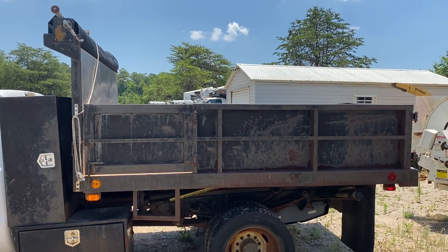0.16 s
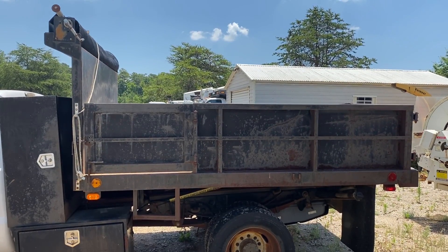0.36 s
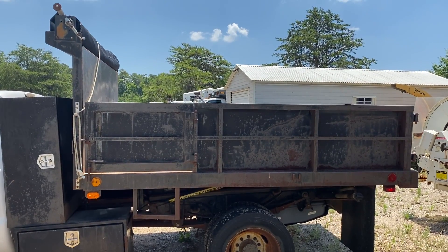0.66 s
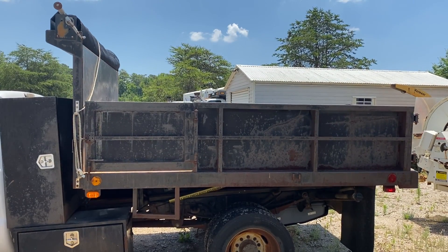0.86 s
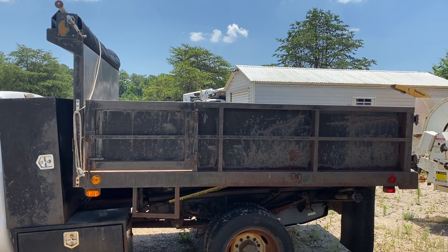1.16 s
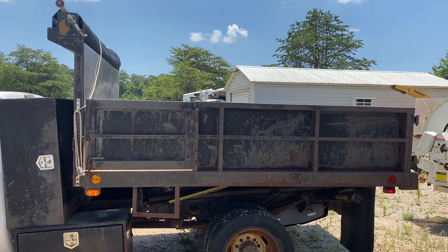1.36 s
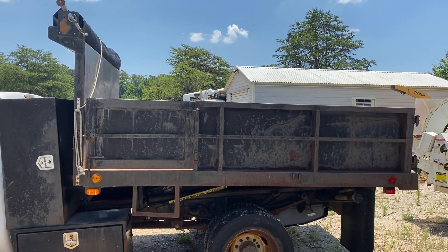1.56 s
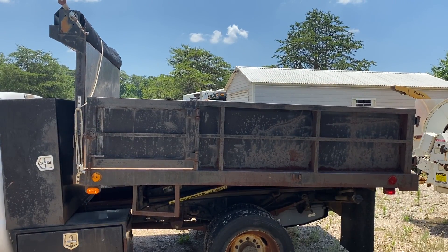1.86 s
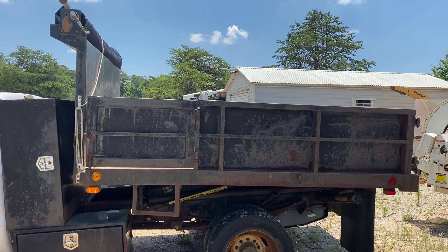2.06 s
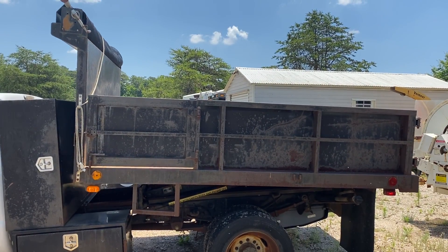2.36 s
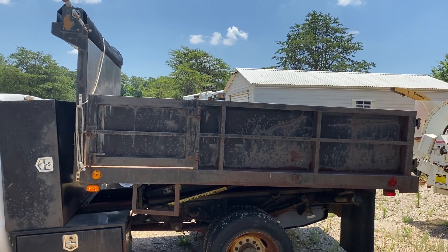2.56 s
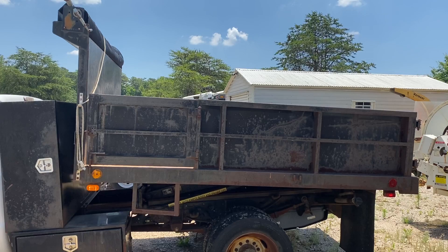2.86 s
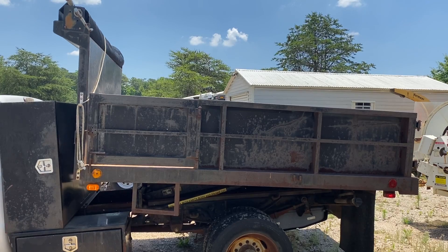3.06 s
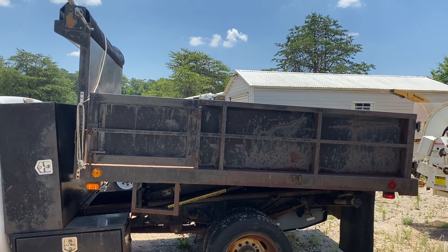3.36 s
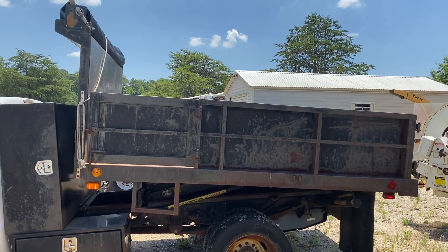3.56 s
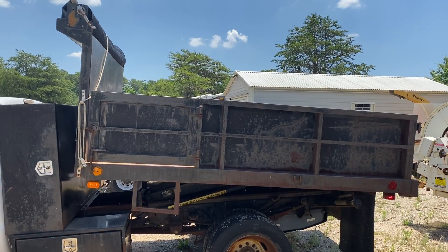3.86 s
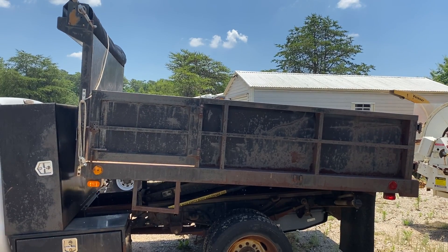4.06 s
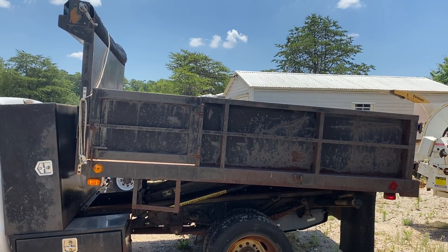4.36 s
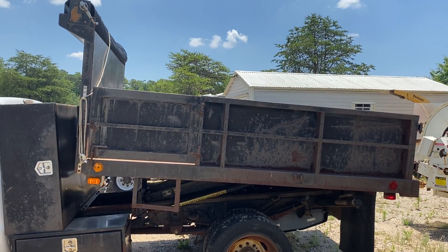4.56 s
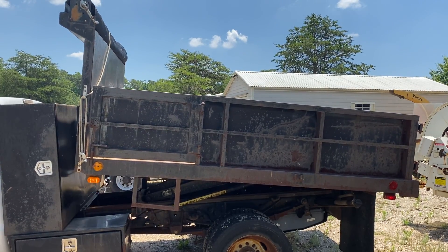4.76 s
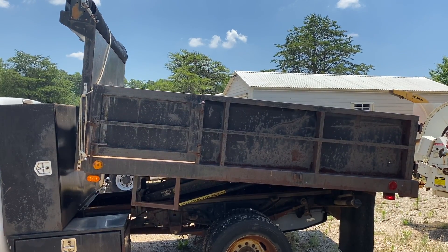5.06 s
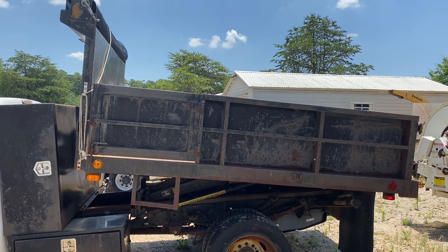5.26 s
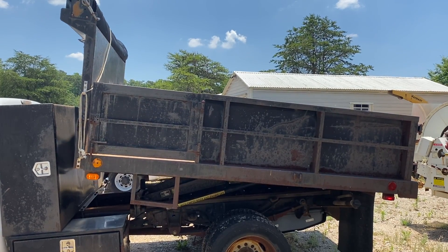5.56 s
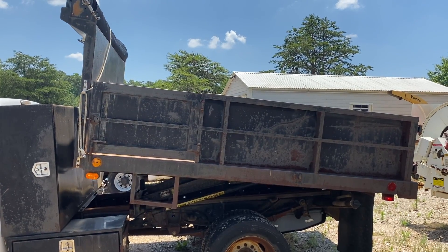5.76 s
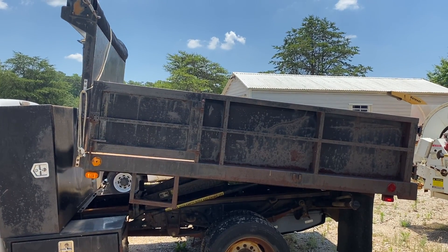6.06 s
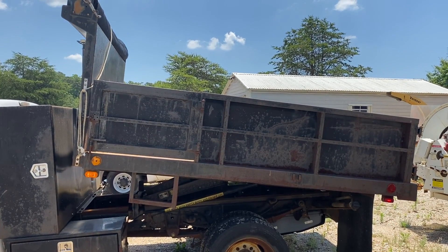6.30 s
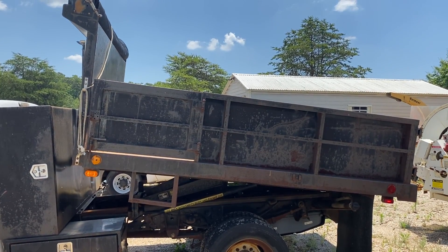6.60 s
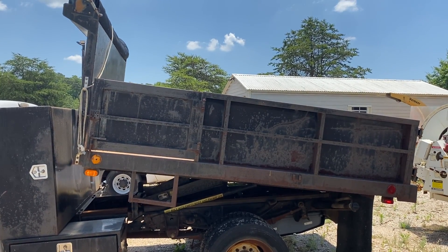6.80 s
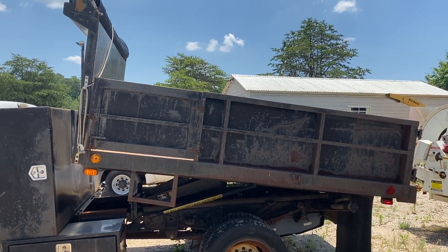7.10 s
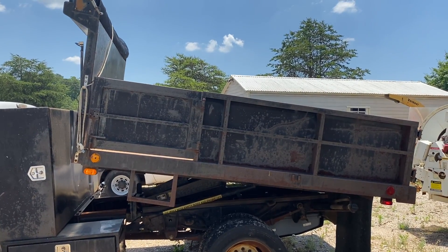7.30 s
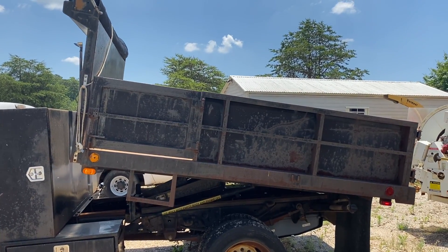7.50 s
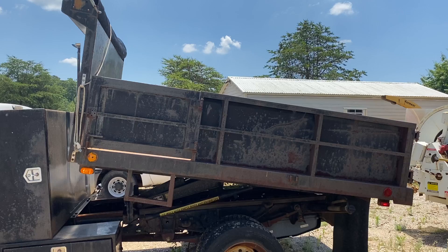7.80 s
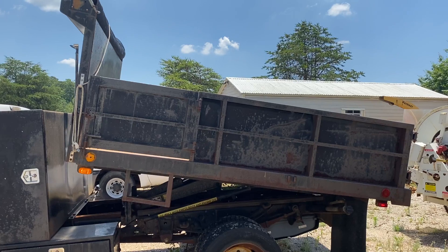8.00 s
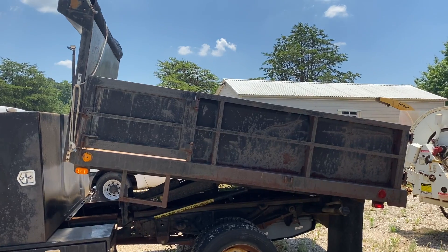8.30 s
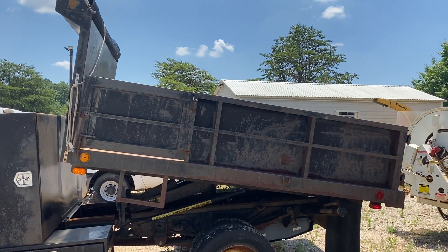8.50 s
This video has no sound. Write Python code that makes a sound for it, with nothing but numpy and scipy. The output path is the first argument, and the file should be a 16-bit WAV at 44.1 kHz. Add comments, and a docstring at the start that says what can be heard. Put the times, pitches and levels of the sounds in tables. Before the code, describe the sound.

Outdoors a few steps from a dump truck, an electric hydraulic pump is already whining as the bed rises. The thin, metallic whine climbs very slightly, swelling and fading, strongest early and mainly on the left. Beneath it an engine idles with low hums and broad rumble, and oil and motor air hiss. A few small taps land at the right; later a panel rings in quick throbs.

```python
"""Beside a dump truck, a few steps off: an electric motor drives the hoist's gear pump and slowly gains speed.
The 13 teeth whine in a stack of sines that swell and fade as the bed rises; a drifting pattern repeated at every
turn of the shaft adds faint lines between them. An engine idles as a firing tone and low hums, behind shaped noise:
a broad rumble, mostly on the left, and a rush of oil and motor air. Later a panel rings in throbbing bouts.
A few small taps, decaying sines, reach almost only the right microphone."""
import sys
import numpy as np
from scipy import signal
from scipy.fft import rfft, irfft, next_fast_len
from scipy.io import wavfile
from scipy.ndimage import uniform_filter1d, map_coordinates

SR = 44100
rng = np.random.default_rng(int(sys.argv[2]) if len(sys.argv) > 2 else 0)


def dump(signal):
    """Clip the signal to [-1, 1] and save it as 16-bit WAV at the path in sys.argv[1]."""
    limited = np.clip(np.atleast_2d(signal).T, -1, 1)
    pcm = np.round(limited * 32767).astype(np.int16)
    wavfile.write(sys.argv[1], SR, pcm)


N = 381024
TIME = np.arange(N) / SR
TEETH, SLOTS = 13, 29  # pump teeth and motor slots, passing once each per shaft turn
CYLINDERS = 8
BOUT_THROB_HZ = 7.5

# The pump gaining speed. Each row: time in seconds, tooth contacts in Hz.
PUMP_SPEED = [(0.0, 1099.0), (0.56, 1106.6), (1.04, 1115.5), (1.68, 1122.6), (2.0, 1127.5), (3.12, 1138.7),
              (3.36, 1141.7), (4.16, 1147.1), (4.56, 1151.6), (5.68, 1160.6), (7.92, 1173.8),
              (8.62, 1179.9)]
# The idling engine. Each row: time in seconds, firings in Hz.
ENGINE_FIRING = [(0, 41.97), (1.2, 42.03), (2.5, 41.98), (4.1, 42.09), (5.1, 42.02), (6.0, 41.91),
                 (6.8, 41.95), (8.64, 41.92)]
# Phase between the microphone ports. Each row: frequency in Hz, lead of the right port in rad.
PORT_LEAD = [(25, -0.45), (110, -0.83), (215, -1.65), (330, 0.49), (1200, 0.5), (2000, -2), (3000, 0.029),
             (6500, -1.67)]


def amp(db):
    """Gain of a level in dB."""
    return 10 ** (np.asarray(db) / 20)


def along(points, hz):
    """Columns of (Hz, value, ..) points read on a log axis."""
    f, *cols = np.transpose(points)
    return np.squeeze([np.interp(np.log(hz + 1), np.log(f + 1), c) for c in cols])


def curves(rows):
    """One value per sample for each column after the time."""
    s, *cols = np.transpose(rows)
    return np.array([np.interp(TIME, s, c) for c in cols])


def swells(rows):
    """Gain of (s, dB, ..) rows, joined in amplitude: round tops and sharp dropouts."""
    s, *cols = np.transpose(rows)
    return np.squeeze([np.interp(TIME, s, amp(c)) for c in cols])


def wobble(rate, times=TIME):
    """A smooth random curve, rate knots a second."""
    coarse = TIME[::64]
    knots = rng.standard_normal(int(N * rate / SR) + 4)
    return np.interp(times, coarse, map_coordinates(knots, [coarse * rate]))


def lift_db(modes, hz):
    """Narrow resonant lifts at (Hz, width Hz, dB) modes."""
    return sum(db / (1 + (2 * (hz - c) / w) ** 2) for c, w, db in modes)


def filtered(x, response):
    """x times a complex response of frequency."""
    m = next_fast_len(N + SR // 2)
    return irfft(rfft(x, m) * response(np.fft.rfftfreq(m, 1 / SR)), m)[..., :N]


def ports(pair, level_db):
    """Two unrelated signals mixed to the likeness, phase and level of the left and right channels."""
    # How alike the two microphone ports are below the treble. Each row: frequency in Hz, likeness from 0 to 1.
    alike = [(25, .5), (60, 0.82), (200, 0.91), (260, 0.4), (380, 0.98), (600, 0.76), (1400, 0.34),
             (3000, 0.47), (5500, 0.41), (7000, 0.6)]
    # Likeness of the left and right channels in the treble. Each row: frequency in Hz, likeness from 0 to 1.
    treble_alike = [(8500, .99), (9900, .8), (10900, .99), (12000, .75), (13000, .99), (14300, .8),
                    (15200, .99)]
    # Phase between the channels in the treble, in steps of half a turn.
    # Each row: frequency in Hz, phase of right against left in rad.
    treble_phase = [(8550, 3.14), (9500, 3.14), (10700, 6.28), (11650, 6.28), (12600, 9.42), (13500, 9.42),
                    (14900, 12.57)]

    def response(hz):
        likeness = np.clip(along(alike + treble_alike, hz), 0, 1)
        turn = np.arccos(likeness) / 2
        mix = np.array([[np.cos(turn), np.sin(turn)], [np.cos(turn), -np.sin(turn)]])
        shift = np.exp(.5j * np.outer([-1, 1], along(PORT_LEAD + treble_phase, hz)))
        return mix * (shift * amp(level_db(hz)))[:, None]
    return filtered(pair[None], response).sum(axis=1)


def noise(spectrum, patchy_db, modes=()):
    """Noise of a given density in both channels, with patches of random gain and narrow lifts."""
    z = signal.stft(rng.standard_normal((2, N)), nperseg=512)[2]
    field = rng.standard_normal(z.shape[1:])
    field = uniform_filter1d(field, size=6, axis=0)  # smooth over frequency
    field = uniform_filter1d(field, size=14, axis=1)  # smooth over time
    patches = amp(patchy_db * field / field.std())
    pair = signal.istft(z * patches, nperseg=512)[1][:, :N]
    return ports(pair * np.sqrt(SR / 2), lambda hz: along(spectrum, hz) + lift_db(modes, hz))


def teeth(turns, firing):
    """Strong tooth and slot tones; the moving bed shifts their reflections, so each fades in its own time."""
    # The main whine. Each row: time in seconds, left and right RMS level in dB, left lead in rad.
    whine = [(0.0, -31.5, -45, -2), (0.48, -27, -36, 0.5), (0.8, -31.5, -48, 3), (1.04, -29.5, -45, 4.5),
             (1.36, -30.5, -57.0, 8.5), (1.6, -45, -40.5, 8), (1.68, -58, -42.5, 8), (1.84, -41, -36, 6),
             (2.16, -31, -34.5, 6.5), (2.8, -38.5, -64, 5.5), (2.9, -42, -56, 4.5), (2.97, -54, -47.5, 4),
             (3.08, -52, -46, 5), (3.23, -40.5, -40, 6.5), (3.52, -36, -40.5, 6.5), (4.16, -35.5, -47.5, 6),
             (4.32, -38, -54, 4.3), (4.46, -38.5, -53, 4), (4.62, -52, -47, 3.5), (4.73, -45.5, -48, 1.5),
             (5.12, -37.5, -46.5, 1.0), (6.16, -39.5, -50, -0.5), (6.4, -45, -49.5, -1.5),
             (6.72, -47, -47.0, -1.1), (6.96, -42.5, -50, -2), (7.6, -46, -49, -1.3), (8.08, -38, -47, 0.5),
             (8.62, -35, -40.5, 1.1)]
    # Tooth tones 2 to 5 and the motor's slot tone (29), keyed by order of the shaft.
    # Each row: time in seconds, left and right RMS level in dB, left lead in rad.
    overtones = { 26: [(0.0, -63, -66.0, 2.8), (0.54, -49, -55, 0), (0.75, -57, -61.5, 1),
                 (1.14, -54, -56, 2.2), (1.62, -48, -54, 0.7), (2.01, -53.5, -53, 0.3),
                 (2.88, -52.5, -51.5, 0.2), (3.15, -63.5, -67, -2), (3.45, -52.0, -51, -1),
                 (3.66, -46.5, -51.0, 0.3), (4.08, -48.5, -59, -0.3), (4.41, -62.0, -61.0, -0.9),
                 (4.56, -58.0, -68.0, -4), (4.86, -53, -57.5, -5), (5.13, -58.5, -59, -5.5),
                 (6.21, -50.5, -60, -8.5), (6.69, -57.5, -63, -7.0), (7.17, -52, -49.0, -5.6),
                 (7.74, -46.5, -46.5, -5), (8.04, -64.0, -58.0, -5.9), (8.11, -72, -68, -5.5),
                 (8.19, -56, -63.5, -5), (8.61, -51.0, -50.5, -5.1)], 39: [(0.0, -60, -59.5, 3.5),
                 (0.15, -53, -54.0, 0), (0.42, -54, -64.5, 0), (0.66, -57, -61, 3.2),
                 (1.02, -49.5, -53.5, 1.3), (1.68, -57.5, -58, 0.3), (2.34, -45.5, -49.0, 0.7),
                 (2.82, -56, -55, 0.9), (3.21, -47.0, -56.5, 1.3), (3.63, -46.5, -52.0, 0.9),
                 (4.32, -49.5, -57.0, 1.5), (4.92, -51.5, -58, 1), (5.07, -67.0, -66, 1),
                 (5.31, -47.5, -57, 1.7), (6.18, -53.5, -54.5, 1.2), (6.57, -54, -61.0, 1.5),
                 (7.2, -66, -64, -1.5), (7.44, -48, -61.5, 0.6), (7.74, -49, -56.5, 0.8),
                 (8.07, -66.0, -67.5, 1), (8.37, -49.0, -60.0, 7.5), (8.61, -68.0, -69.0, 4)],
                 52: [(0.0, -53.5, -56, -0.5), (0.24, -54.5, -60.0, -0.5), (0.51, -59.5, -64.0, -4.1),
                 (0.78, -50.5, -60.5, -6), (0.96, -57, -58.5, -7), (1.53, -50.5, -54.0, -5.5),
                 (1.65, -57, -64, -6), (2.46, -45.5, -49.5, -5.5), (2.79, -63.5, -65.5, -5),
                 (3.09, -45.5, -51.5, -5.5), (3.45, -46, -50.0, -5.8), (3.78, -54, -62, -6.7),
                 (4.05, -47.5, -58.0, -4.9), (4.56, -59, -55, -7.5), (4.95, -53.5, -67, -7.5),
                 (5.49, -55, -65, -8), (5.76, -49.0, -63.5, -5.4), (6.0, -62, -66.5, -6),
                 (6.36, -52, -53, -7), (6.54, -69.0, -75.0, -6), (7.26, -42.0, -54, -5.5),
                 (8.1, -43.0, -47.5, -5.5), (8.43, -66, -71.0, -4.5), (8.61, -48.5, -72.5, -1)],
                 65: [(0.0, -58, -60.0, 2), (0.18, -49, -49.5, -1), (0.27, -58, -52.5, 0),
                 (0.48, -50, -47, -4.4), (0.63, -44, -57.5, -2), (0.72, -46, -50.0, 1),
                 (0.93, -55.5, -50.0, -0.5), (1.05, -61, -64, 0.5), (1.29, -53.0, -48.0, -1),
                 (1.44, -60.5, -49, 1), (1.68, -53, -52, 0.6), (2.04, -52, -70.5, -1.5),
                 (2.25, -62.0, -63.0, -1.8), (2.43, -60, -61.5, 2.1), (2.73, -54, -63.5, 4.5),
                 (2.88, -57, -76.5, 1), (3.18, -64.0, -55, 2.5), (4.11, -52.5, -67.5, 11.5),
                 (4.44, -83.0, -66, 15), (4.77, -59.0, -63, 13.5), (5.49, -70, -70, 5), (5.76, -59, -57, 6),
                 (6.21, -63, -65, 6.5), (6.93, -58, -55, 5), (7.29, -58.0, -60.0, 6),
                 (7.5, -66.0, -66.0, 0.3), (7.77, -62.5, -57, -1.3), (8.61, -61.0, -65.5, 6)],
                 29: [(0.0, -61, -62.5, 1.6), (0.45, -58, -70.5, 7.5), (1.65, -50.5, -55.5, 6.9),
                 (2.13, -58, -63, 6.9), (2.55, -51.5, -52.0, 6.9), (3.0, -61.0, -61, 6.7),
                 (4.2, -63, -66.5, 6.1), (4.62, -57, -56.5, 7.3), (5.25, -61.0, -68.0, 7.6),
                 (5.67, -53, -66.0, 6.6), (6.36, -61, -61.0, 7.1), (6.45, -76.0, -66.0, 5.8),
                 (7.05, -54, -63, 6.6), (8.61, -55, -56, 7.0)], }
    # The main whine drops out for a moment: centre in seconds, Gaussian width in seconds.
    dropout = (3.244, .009)
    out = np.zeros((2, N))
    for order, rows in {TEETH: whine, **overtones}.items():
        left, right, _ = swells(rows)
        lead = curves(rows)[2]
        # the idling engine shakes the pump, which bends high tones most
        shake = 0.0032 * order * wobble(2.37) * np.sin(firing)
        phase = 2 * np.pi * order * turns + shake
        flutter_db, rate = 0.9, 11
        if order == TEETH:
            flutter_db = 0.4
        elif order == SLOTS:
            flutter_db, rate = 1.6, 28
        gain = amp(flutter_db * np.array([wobble(rate), wobble(rate)]))
        if order == TEETH:
            centre_s, width_s = dropout
            gain = gain * (1 - np.exp(-((TIME - centre_s) / width_s) ** 2))
        out += gain * [left * np.sin(phase + lead / 2), right * np.sin(phase - lead / 2)]
    return np.sqrt(2) * out


def seventh_tone(turns):
    """The 7th tooth tone, faint except while it glides through narrow resonances."""
    # The resonances. Each row: frequency in Hz, width in Hz, lift in dB.
    lifts = [(7675, 40, 11), (7700, 120, 9.2), (7780, 30, 4), (8060, 13, 3.8)]
    # The stereo balance: right level over the left in dB, left lead in rad.
    side = (1.8, -0.5)
    over_db, lead_rad = side
    base_db, waver_db = -68, 2.5
    level_db = base_db + lift_db(lifts, 7 * curves(PUMP_SPEED)[0])
    phase = 2 * np.pi * 7 * TEETH * turns
    runout = 1 + 0.49 * np.sin(2 * np.pi * turns + wobble(3))  # lines one turn to each side
    level = runout * amp(level_db + waver_db * wobble(5))
    return np.sqrt(2) * level * [np.sin(phase + lead_rad), amp(over_db) * np.sin(phase)]


def shaft(turns):
    """No two teeth are alike: a pattern that repeats every turn and slowly drifts."""
    # Lines at each shaft turn, ahead of side and housing gains. Each row: frequency in Hz, level in dB.
    turn_lines = [(300, -62), (1200, -69), (2000, -80), (2700, -75), (4500, -73), (5200, -79), (5800, -71),
                  (7400, -73), (8600, -84), (12000, -85), (15000, -83)]
    # Weaker high tooth tones, ahead of the same gains. Each row: multiple of the tooth rate, level in dB.
    high_tones = [(6, -66), (8, -74), (9, -77), (10, -74), (11, -72), (12, -76), (13, -73), (14, -70)]
    # Side gains of the shaft lines. Each row: frequency in Hz, left and right gain in dB.
    side = [(1000, 0, -5), (4500, 0, -4), (6500, 0, 0)]
    # The pump housing lifts a tone gliding through. Each row: frequency in Hz, width in Hz, lift in dB.
    housing = [(348, 10, 17), (2845, 30, 9), (7700, 400, 4), (10090, 100, 10), (10360, 50, 11),
               (11140, 250, 8), (12775, 90, 11), (13330, 220, 9), (13770, 120, 9), (14560, 120, 11),
               (14920, 160, 6), (15270, 90, 10)]
    drift_s, steps, orders = .25, 4096, np.arange(1, 190)
    line_db = along(turn_lines, orders * turns[-1] * SR / N)
    level = amp(line_db + rng.normal(0, 0.56, len(orders)))
    level[TEETH - 1::TEETH] = 0
    for multiple, db in high_tones:
        # run-out of the shaft puts lines beside each tooth tone
        level[multiple * TEETH - 2:][:4] += amp(db - np.array([14, 0, 12, 18]))
    level[2 * SLOTS - 1::SLOTS] *= amp(6)  # slot overtones stand out
    knots = int(N / SR / drift_s) + 2
    drawn = rng.standard_normal((2, knots, len(orders), 2)) @ [1, 1j]
    tooth = orders % TEETH == 0
    steady = np.array([1.3, 0])[:, None, None]
    drawn[..., tooth] = 0.17 * drawn[..., tooth] + steady  # the tooth tones hold steady
    lines = np.zeros((2, knots, steps // 2 + 1), complex)
    lines[..., orders] = drawn * level * steps / 2
    where = [TIME / drift_s, turns % 1 * steps]
    patterns = irfft(lines, steps)
    pair = np.array([map_coordinates(p, where, order=1, mode="grid-wrap") for p in patterns])
    blend = where[0] % 1
    pair = pair / np.hypot(blend, 1 - blend)  # even power while one pattern gives way to the next
    return ports(pair, lambda hz: along(side, hz) + lift_db(housing, hz))


def hums(firing):
    """Firing tone and hums, steady or smeared; engine lines start in step and make a lump each cycle."""
    # The firing tone wavers, sinks, then returns. Each row: time in seconds, RMS level in dB, waver in dB.
    idle = [(0, -43, 9), (1.15, -43, 1), (1.3, -49.5, 5), (4.55, -53, 4), (4.7, -45.5, 2), (6.8, -43, 2),
            (8.64, -39, 1.6)]
    # One row for each hum, cycle orders then the fixed-frequency hums: left and right RMS level in dB at mid-
    # scene, unsteadiness from 0 to 1, growth in dB per second.
    hum_levels = [(-55, -56, .2, 0), (-49.5, -48.5, 0.07, -0.5), (-48.5, -48, 0.23, 0),
                  (-41.5, -43.5, 0.07, -.66), (-50.5, -53.5, 0.05, 0), (-44.5, -53.5, 0.1, 0.8),
                  (-51, -57, .15, 0), (-51.5, -63, 0.16, 0), (-39.5, -53, 0.08, 0), (-53.5, -62, 0.3, 0.5),
                  (-60.5, -72, 0.1, 1.5), (-56.5, -68, 0.2, 0), (-55, -65, 0.25, 1), (-59, -69, .2, 1.5),
                  (-63, -72, 0.14, 0), (-56.5, -63.5, 0.1, 1.2), (-55, -54, 0.25, -0.5),
                  (-43.5, -48.5, 0.38, -.5), (-43, -51, 0.35, 0.4), (-55, -72, .2, 0), (-52.5, -72, .4, 0),
                  (-55, -65, 0.06, 0), (-59, -71, 0.25, 0.5), (-54.5, -67, 0.44, 0.5), (-58.5, -69, 0.3, 0)]
    # Engine hums from uneven cylinders, as multiples of the whole engine cycle.
    cycle_orders = (11, 12, 14, 16, 24, 32, 36, 38, 40, 43, 56, 64, 72, 74, 152, 160)
    # Further hums at fixed frequencies in Hz, mostly of the body; 547 Hz is the engine's 13th firing overtone.
    fixed_hz = (76.7, 130.7, 159.7, 279.6, 319, 349, 493.5, 547, 655.5)
    coarse = 8  # all are low enough to be made at every 8th sample
    t, firing = TIME[::coarse], firing[::coarse]
    level_db, waver_db = curves(idle)[:, ::coarse]
    firing_db = level_db + waver_db * wobble(6.5, t)
    out = amp(firing_db) * np.sin(firing + [[.25], [-.25]])
    cycle_hz = curves(ENGINE_FIRING).mean() / CYLINDERS
    phases = [(k * cycle_hz, k * firing / CYLINDERS) for k in cycle_orders]
    phases += [(hz, 2 * np.pi * hz * t) for hz in fixed_hz]
    for (hz, phase), (left_db, right_db, loose, growth_db) in zip(phases, hum_levels):
        smear = wobble(5, t) + 1j * wobble(5, t)
        swing = np.sqrt(1 - loose) + np.sqrt(loose / 2) * smear
        tone = amp(growth_db * (t - t.mean())) * swing * np.exp(1j * phase)
        lead = np.exp(.5j * along(PORT_LEAD, hz) * np.array([[-1], [1]]))
        out += amp([[left_db], [right_db]]) * (tone * lead).real
    return np.sqrt(2) * signal.resample_poly(out, coarse, 1, axis=1)[:, :N]


def rumble(firing):
    """Broad low noise that each firing swells, with a slower lump from uneven cylinders."""
    # Rumble spectrum. Each row: frequency in Hz, left and right density in dB per Hz before the swell.
    low = [(25, -70.6, -77), (33, -72, -74), (48, -61, -59), (62, -52, -56), (78.3, -54.5, -56),
           (98, -58.9, -61), (115, -62, -60.5), (146, -57, -60), (159, -56.5, -63), (193, -57, -64),
           (249, -64, -86), (336, -59, -73), (430, -63, -71), (591, -68, -73)]
    throb_db = 0.63 * np.sin(firing) + 0.36 * np.sin(firing / 4) + 0.28 * wobble(9)
    swell_db = -0.17 * wobble(2.9) - 0.12 * (TIME - TIME.mean())  # sinks slowly, in dB per second
    spectrum = [(10, -100, -100)] + low + [(874, -100, -100)]
    return noise(spectrum, patchy_db=0.53) * amp(swell_db + throb_db)


def rush(firing):
    """Hissing noise of oil and motor air, rung by steel panels and swelled by each firing."""
    # Middle of the rush. Each row: frequency in Hz, left and right density in dB per Hz before the lifts.
    middle = [(653, -68, -73), (943, -74.5, -79.5), (1180, -71.5, -74), (1215, -69, -83),
              (1340, -76.5, -80.5), (2000, -81, -84), (2640, -82, -87.5), (3070, -84, -88.5),
              (4560, -85, -90), (4850, -89, -92.5), (6230, -93.5, -97)]
    # Top of the rush. Each row: frequency in Hz, left and right density in dB per Hz before the lifts.
    hiss = [(7500, -93, -93.5), (8600, -100, -100), (9700, -105, -105), (10800, -103.5, -103.5),
            (12000, -109, -109), (14000, -105, -105), (15500, -105.5, -105.5)]
    # Steel panels that ring. Each row: frequency in Hz, width in Hz, lift in dB.
    panels = [(1117, 17, 8), (1529, 43, 4.5), (2570, 84, 6.5), (2945, 17, 10), (5550, 100, 10.5)]
    spectrum = [(463, -100, -100)] + middle + hiss
    return noise(spectrum, patchy_db=0.84, modes=panels) * amp(0.47 * np.sin(firing))


def taps():
    """A short tick and a dull thud that swells in more slowly, both decaying sines near the right port."""
    # Each row: start in seconds, tick and thud level in dB before onset, decay and the mixing gains.
    hits = [(0.361, -28, -40), (.535, -50, -24), (1.43, -26, -24), (2.466, -30, -36), (4.5082, -21.5, -22),
            (5.758, -27, -36), (7.935, -50, -23), (8.27, -50, -27)]
    out, t = np.zeros(N + SR), np.arange(SR // 10) / SR
    for s, tick_db, thud_db in hits:
        tick = amp(tick_db - 60 * t / 0.018) * (1 - np.exp(-t / 0.0018))  # falls 60 dB in 18 ms
        tick = tick * (np.sin(2 * np.pi * 1150 * t) + 0.31 * np.sin(2 * np.pi * 1650 * t))
        thud = amp(thud_db - 60 * t / 0.042) * (1 - np.exp(-(t / 0.0041) ** 2))
        thud = thud * np.sin(2 * np.pi * 230 * t)
        out[round(s * SR):][:len(t)] += 2.0 * tick + 1.5 * thud
    return out[:N] * [[-.1], [1]]


def under_fifth(turns, firing):
    """A tone one firing rate under the 5th tooth tone, heard while it crosses a panel resonance."""
    # The panel. Each row: frequency in Hz, width in Hz, lift in dB.
    panel = [(5558, 24, 30)]
    hz = 5 * curves(PUMP_SPEED)[0] - curves(ENGINE_FIRING)[0]
    phase = 2 * np.pi * 5 * TEETH * turns - firing
    return np.sqrt(2) * amp(-85 + lift_db(panel, hz)) * np.sin(phase)


def whistle(turns):
    """The line two turns under the 5th tooth tone whistles in throbs while it crosses the panel."""
    # The panel. Each row: frequency in Hz, width in Hz, lift in dB.
    panel = [(5577, 30, 19)]
    order = 5 * TEETH - 2
    throb = np.cos(np.pi * BOUT_THROB_HZ * (TIME - 4.43))
    level = amp(-75 + lift_db(panel, order * curves(PUMP_SPEED)[0] / TEETH))
    return np.sqrt(2) * level * throb * np.sin(2 * np.pi * order * turns)


def bouts():
    """A panel's narrow ring just under the whine, coming in quick throbs."""
    # Each row: time in seconds, amplitude on the left in dB, averaged over the throbs.
    levels = [(0, -70), (5.7, -73), (6.1, -51), (6.6, -66), (6.85, -50), (7.25, -50), (7.5, -66),
              (8.1, -49.5), (8.35, -62)]
    ring_hz = 1113
    throb = np.sin(np.pi * BOUT_THROB_HZ * TIME + 0.6 * wobble(3)) ** 2
    ring = np.sin(2 * np.pi * ring_hz * TIME + 0.68 * wobble(14))
    return 2 * swells(levels) * throb * ring * amp([[0], [-3]])


def scene():
    """Pump, engine, rumble, rush, taps and panel, driven by shaft turns and firing phase."""
    turns = np.cumsum(curves(PUMP_SPEED)[0]) / TEETH / SR
    firing = 2 * np.pi * np.cumsum(curves(ENGINE_FIRING)[0]) / SR
    pump = teeth(turns, firing) + seventh_tone(turns) + shaft(turns)
    background = hums(firing) + rumble(firing) + rush(firing)
    panel = under_fifth(turns, firing) + whistle(turns) + bouts()
    return pump + background + taps() + panel


def record(dry):
    """The camera keeps nothing above its band limit of 15750 Hz."""
    return filtered(dry, lambda hz: hz < 15750)


dry = scene()
out = record(dry)
dump(out)
```